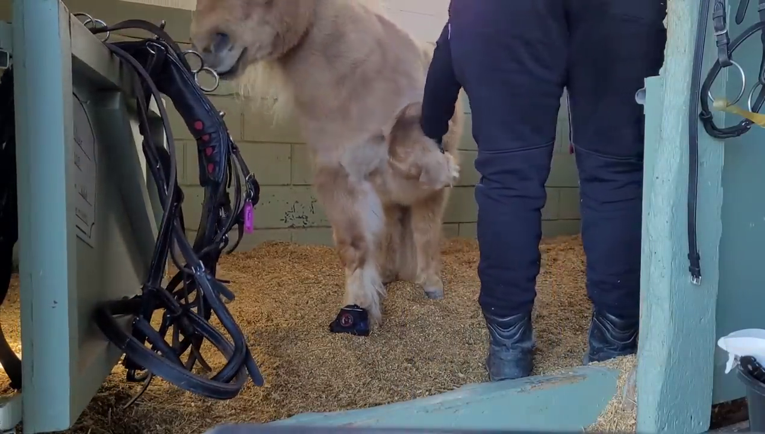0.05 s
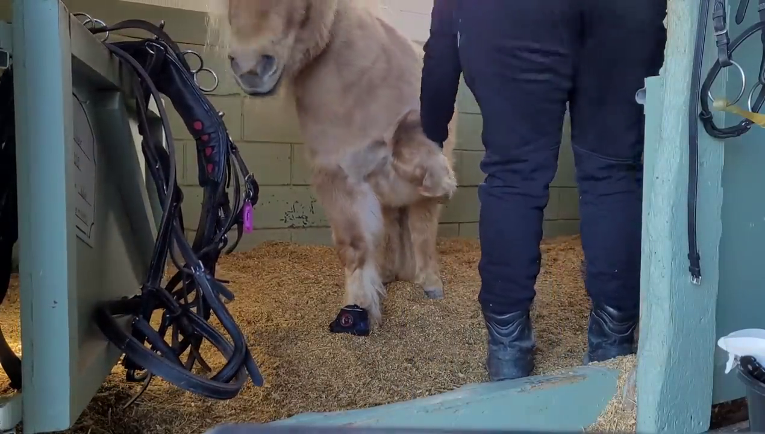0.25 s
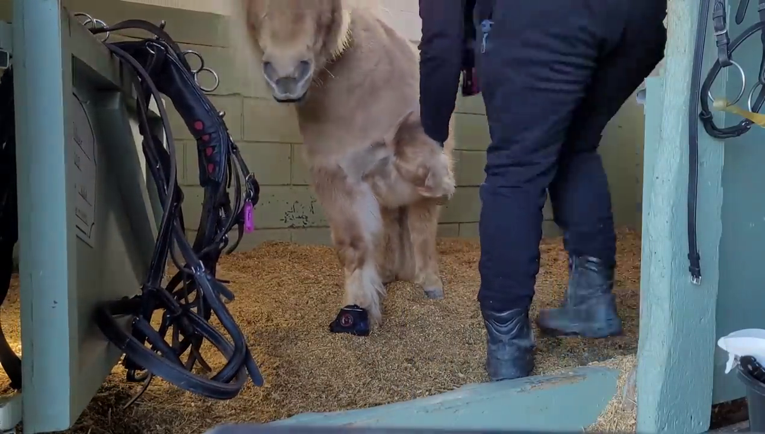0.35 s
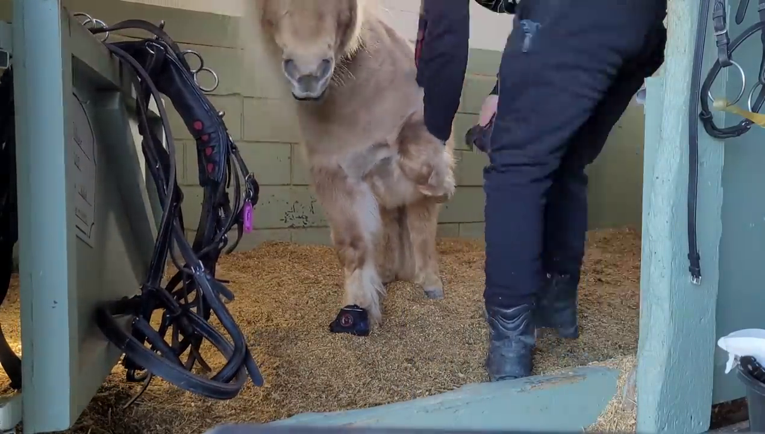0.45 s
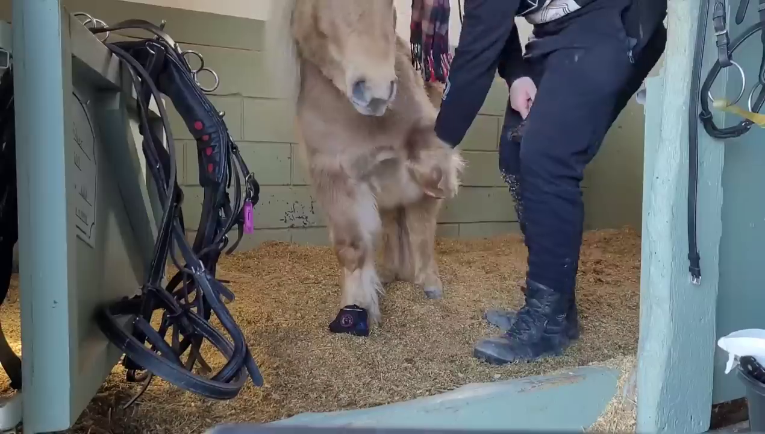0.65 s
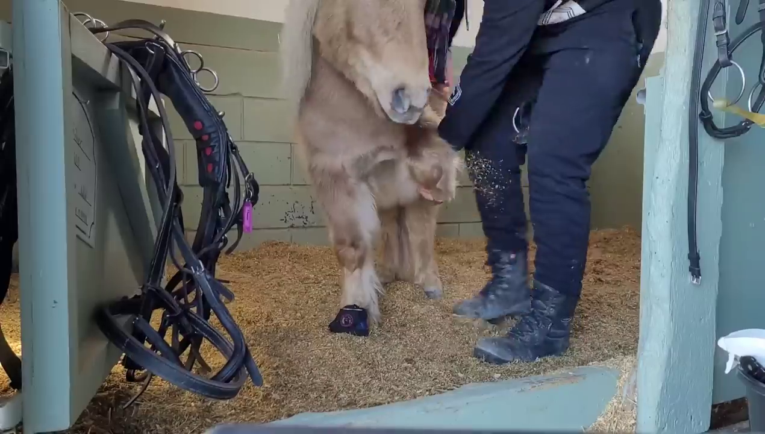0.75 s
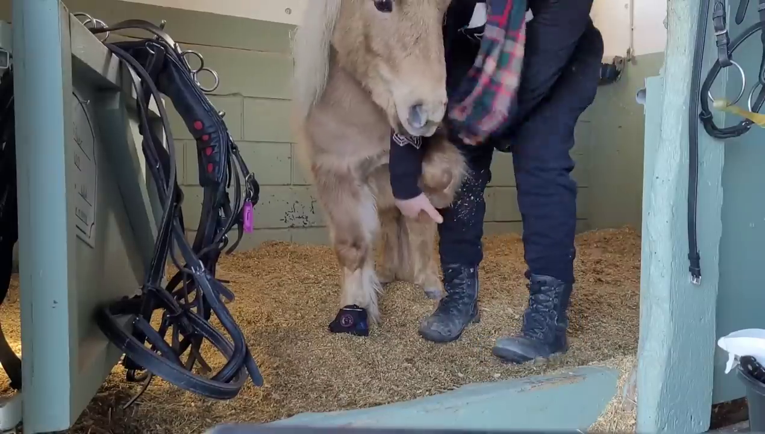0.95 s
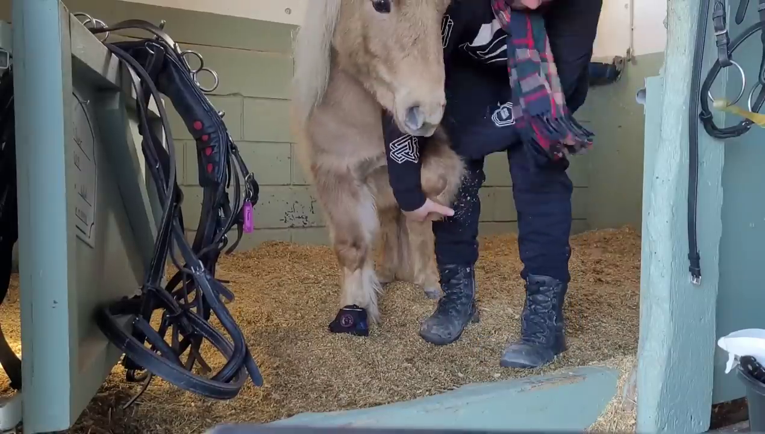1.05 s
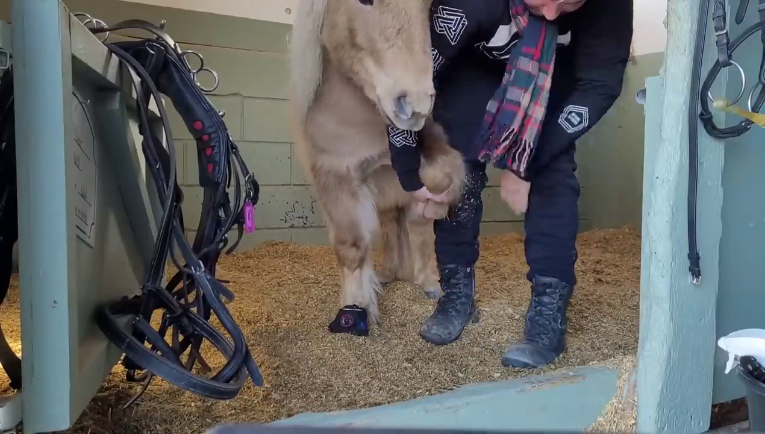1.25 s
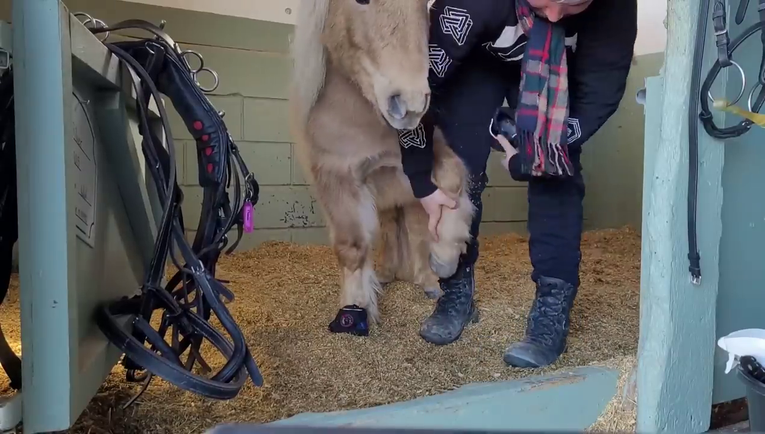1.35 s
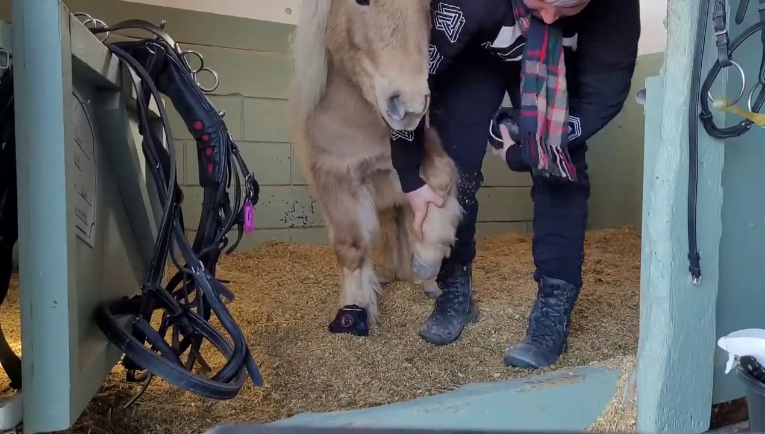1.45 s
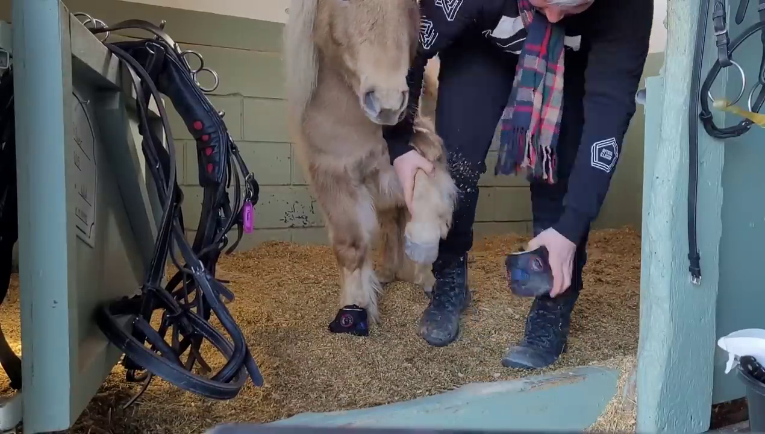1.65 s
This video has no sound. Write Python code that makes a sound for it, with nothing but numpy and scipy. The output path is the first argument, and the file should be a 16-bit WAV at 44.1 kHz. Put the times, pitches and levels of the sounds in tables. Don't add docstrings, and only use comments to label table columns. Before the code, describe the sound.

One dull, hollow wooden knock in a small stable, with soft rustles, ticks and low hum.

```python
import sys
import numpy as np
from scipy import signal
from scipy.io import wavfile
from scipy.ndimage import uniform_filter1d

SR = 44100
rng = np.random.default_rng(int(sys.argv[2]) if len(sys.argv) > 2 else 0)


def materialize(psi):
    bounded = np.clip(np.atleast_2d(psi).T, -1, 1)
    quanta = np.round(bounded * 32767).astype(np.int16)
    wavfile.write(sys.argv[1], SR, quanta)


def voltage_ratio(decibels):
    exponent = np.asarray(decibels, float) / 20
    return 10 ** exponent


N = 74970


def rms_one(x):
    return x / np.sqrt(np.mean(x ** 2) + 1e-20)


def in_time(rows):
    s, *columns = np.transpose(rows)
    return [np.interp(np.arange(N) / SR, s, column) for column in columns]


def at_hz(points, hz):
    table_hz, values = np.transpose(points)
    return np.interp(np.log(hz), np.log(table_hz), values)


def pan(db):
    return voltage_ratio(np.array([[db / 2], [-db / 2]]))


def filtered(x, order, cut_hz, kind):
    return signal.sosfilt(signal.butter(order, cut_hz, kind, fs=SR, output="sos"), x)


def drift(rate):
    r = np.exp(-80 * np.pi * rate / SR)
    noise = rng.standard_normal(N // 40 + 2002)
    slow = signal.lfilter([1], [1, -2 * r, r * r], noise)[2000:]
    return np.interp(np.arange(N) / 40, np.arange(len(slow)), rms_one(slow))


def strikes(s, db):
    out = np.zeros(N)
    out[(np.asarray(s) * SR).astype(int)] = voltage_ratio(np.asarray(db))
    return out


def ring(clicks, hz, t60):
    r, w = voltage_ratio(-60 / (t60 * SR)), 2 * np.pi * hz / SR
    return signal.lfilter([0, np.sin(w)], [1, -2 * r * np.cos(w), r * r], clicks + 1e-18)


def ring_modes(modes, clicks, cut_hz):
    body = sum(voltage_ratio(db) * pan(lean_db) * ring(clicks, hz, t60) for hz, db, t60, lean_db in modes)
    return filtered(body, 3, cut_hz, "low")


def grains():
    per_s, spread_db = 11000, 4.5
    sizes = voltage_ratio(spread_db * np.minimum(rng.exponential(1, (2, N)), 4))
    signs = rng.choice([-1, 1], (2, N))
    return rms_one(sizes * signs * (rng.random((2, N)) < per_s / SR))


def banded(spectrum, patchy_db, white):
    # frequency in Hz, left-right likeness from -1 to 1.
    likeness = [(60, 0.91), (180, 1), (550, 0.25), (1650, -0.21), (4970, -0.1), (15000, 0.0087)]
    # frequency in Hz, left minus right in dB.
    lean = [(60, -2.5), (130, 10.5), (240, -1.5), (950, -2), (3770, 7.5), (15000, -2.5)]
    out, together = 0, drift(8)
    edges = 15.5 * 2 ** np.arange(0, 10.1, .5)
    for k, (low, high) in enumerate(zip(edges, edges[1:])):
        mid, side = filtered(white[k % 2], 2, [low, high], "band")
        hz = np.sqrt(low * high)
        alike = np.clip(at_hz(likeness, hz), -1, 1)
        flicker_db = patchy_db * (.5 * together + drift(25))
        gain = voltage_ratio(at_hz(spectrum, hz) + flicker_db) * pan(at_hz(lean, hz))
        out = out + gain * (np.sqrt(1 + alike) * mid + np.sqrt(1 - alike) * side * [[1], [-1]])
    return rms_one(out)


def still_air():
    # frequency in Hz, level in dB per Hz.
    air_colour = [(15, -32.5), (25, -2), (75, 4), (122, -8), (323, -8), (763, -28.5), (850, -39.5),
                  (2710, -69.5), (15600, -53.5)]
    # time in seconds, level in dB.
    draught = [(0, 1.5), (.2, -2), (.33, 0.5), (.4, -4.5), (.5, 1.5), (.65, -1), (.78, 0), (.88, -0.5),
               (1.0, 0), (1.2, 2), (1.3, -1.5), (1.5, -1), (1.7, -1)]
    swell_db, = in_time(draught)
    return voltage_ratio(-48.5 + swell_db) * banded(air_colour, patchy_db=-2.5, white=rng.standard_normal((2, 2, N)))


def motor():
    # time in seconds, pitch in Hz, level in dB.
    motor_run = [(0, 69.2, -55.5), (.15, 62.1, -48), (.22, 67.56, -42.5), (.44, 67.7, -49.5),
                 (.53, 68.1, -52), (.62, 64.77, -43), (.665, 66.6, -49), (.715, 64.44, -44.5),
                 (.77, 66.2, -52), (.88, 68.9, -45.5), (1.0, 66.8, -45), (1.11, 68.8, -51),
                 (1.19, 66.9, -47.5), (1.35, 68.72, -46), (1.44, 67.7, -47.5), (1.7, 69.5, -49.5)]
    # multiple of the pitch, level in dB.
    overtones = [(1, 1), (2, -12), (3, -18.5), (4, -40)]
    flutter_db, flutter_per_s, wander = 2.2, 5, .04
    hz, db = in_time(motor_run)
    phase = 2 * np.pi * np.cumsum(hz * (1 + wander * drift(5.76))) / SR
    out = 0
    for k, overtone_db in overtones:
        level = np.sqrt(2) * voltage_ratio(db + overtone_db + flutter_db * drift(flutter_per_s))
        apart = 0.25 * drift(4.4) * [[1], [-1]]
        out = out + level * pan(-4.0) * np.cos(k * phase + apart)
    return out


def feet():
    # time in seconds, effort in dB.
    shuffle = [(0, -77.5), (.2, -72.5), (.43, -74.5), (.47, -68.5), (.56, -71), (.65, -70.5), (.7, -66),
               (.93, -66), (1.1, -67), (1.25, -64.5), (1.32, -71), (1.38, -72), (1.43, -70.5), (1.52, -70),
               (1.57, -73), (1.7, -72)]
    # frequency in Hz, level in dB per Hz.
    shavings = [(300, 0.5), (700, 4), (1200, -4), (1900, -7.5), (2500, -26.5), (5000, -24.5),
                (16000, -33.5)]
    effort_db, = in_time(shuffle)
    return voltage_ratio(effort_db + 3.0) * banded(shavings, patchy_db=-1.4, white=[grains(), grains()])


def rustles():
    # start in seconds, length in seconds, level in dB, centre in Hz, width in octaves.
    brushes = [(0.052, 0.042, -82.5, 6740, 0.79), (0.053, 0.037, -86, 13900, 0.56),
               (0.458, 0.048, -81.5, 4040, 2.1), (0.526, 0.082, -82.5, 14500, 0.75),
               (0.567, 0.064, -77, 13000, 1.3), (0.554, 0.084, -79, 7800, 0.57),
               (0.662, .03, -84, 14400, 0.52), (0.78, 0.034, -84, 4500, 1.1),
               (0.93, 0.042, -78, 2180, 0.66), (0.959, 0.021, -78.5, 2400, 0.87),
               (0.997, 0.028, -71, 2920, 0.28), (0.988, 0.028, -67, 2180, 0.74),
               (1.003, 0.035, -82.5, 4440, 0.073), (1.141, 0.027, -76.5, 4974, 0.95),
               (1.256, 0.027, -75, 4500, 1.45), (1.262, 0.017, -86, 5498, 0.13),
               (1.143, .025, -90, 5660, 0.18), (1.334, 0.017, -86, 2415, 0.65),
               (1.354, 0.019, -81.5, 3130, 0.2), (1.358, 0.029, -63, 907, 0.45),
               (1.352, 0.041, -77.5, 9964, 2.1), (1.441, 0.023, -69, 12400, 0.53),
               (1.446, 0.018, -73.5, 3950, 1.07), (1.479, 0.0054, -75, 14000, 0.69),
               (1.488, 0.0317, -71.5, 4400, 3.1), (1.491, 0.021, -70, 12550, 0.78),
               (1.584, 0.02, -86.5, 7500, 0.51), (1.631, 0.02, -86.5, 7170, 0.34),
               (1.635, 0.081, -91, 13600, 0.48)]
    # start in seconds, length in seconds, level in dB, centre in Hz, width in octaves.
    snaps = [(0.346, 0.0022, -74.5, 13020, .5), (0.35, 0.0016, -86, 13600, 0.36),
             (0.435, 0.004, -77, 12800, 0.59), (1.232, 0.0034, -64.5, 1380, 1.9),
             (1.426, 0.0034, -72, 10620, 0.66), (.484, 0.01, -77, 3980, 0.61),
             (0.592, 0.0035, -57, 600, 0.8), (0.828, 0.019, -58, 294, 0.33),
             (0.969, 0.011, -52.5, 557, 0.65), (1.454, 0.0082, -57.5, 854, 0.79),
             (1.493, 0.025, -67, 936, 0.64), (1.506, 0.002, -70, 3583, 1.3),
             (1.662, 0.013, -82.5, 10340, 0.71)]
    rise, fall, longest_t60_s = .22, 2.5, 0.28
    t, crackle, out = np.arange(N) / SR, grains(), np.zeros((2, N))
    for s, length, db, hz, octaves in [*brushes, *snaps]:
        edges = np.minimum(hz * 2 ** (octaves * np.array([-.5, .5])), [15500, 17000])
        swell = np.sin(np.pi / 2 * np.clip((t - s) / (rise * length), 0, 1)) ** 2
        t60 = min(longest_t60_s, fall * length)
        decay = voltage_ratio(-60 * np.maximum(t - s - length, 0) / t60)
        out += voltage_ratio(db) * swell * decay * rms_one(filtered(crackle, 3, edges, "band"))
    return out


def ticks():
    # time in seconds, level in dB, pitch in Hz, t60 in seconds, left minus right in dB.
    taps = [(.046, -34, 276, 0.05, 0.5), (.458, -72, 1810, 0.019, -3), (.481, -66.5, 1907, 0.043, -13),
            (.488, -63.5, 1840, 0.039, -2), (0.487, -57, 1259, 0.03, -1.5), (.509, -68, 1900, 0.014, 2),
            (.622, -85, 7730, 0.025, 15), (0.625, -80, 10480, 0.025, 0), (.688, -66, 1530, 0.026, -12),
            (0.7171, -52.5, 1250, 0.02, -4), (1.666, -72.5, 1670, 0.029, 6),
            (1.668, -75, 2860, 0.013, -3.5)]
    rise_cycles, detune_spread = 5.0, .035
    out = np.zeros((2, N))
    for s, db, hz, t60, lean_db in taps:
        age = np.maximum(np.arange(N) / SR - s, 0)
        shape = voltage_ratio(db + 8 - 60 * age / t60) * (1 - np.exp(-age * hz / rise_cycles)) ** 2
        mode_hz = hz * (1 + detune_spread * rng.normal(0, 1, (2, 3, 1)))
        out += pan(lean_db) * shape * np.sin(2 * np.pi * mode_hz * age).sum(axis=1)
    return out


def panel(s, db):
    # pitch in Hz, level in dB, t60 in seconds, left minus right in dB.
    panel_modes = [(221.2, -24, 0.14, 2), (252.4, -21.5, 0.13, -6), (305.5, -3, 0.042, -0.5),
                   (411, -18.5, 0.052, -14), (492, -13.5, 0.068, -7.5), (655, -26.5, 0.1, 3.5),
                   (819.5, -16, 0.063, -3), (953, -35.5, 0.032, -25), (1039, -25.5, 0.075, 14.5)]
    return ring_modes(panel_modes, strikes(s, db), cut_hz=630)


def frame_boom():
    # time in seconds, level in dB.
    shoves = [
        (0.248, -22),
        (0.256, -24),
        (0.2723, -22),
    ]
    # pitch in Hz, level in dB, t60 in seconds, left minus right in dB.
    boom_modes = [(54, -17, .3, -1), (78, .5, .42, -2), (116, -5, .19, -2.5)]
    damped_s, damped_t60_s = .335, .2
    boom = ring_modes(boom_modes, strikes(*np.transpose(shoves)), cut_hz=244)
    return boom * voltage_ratio(-60 * np.maximum(np.arange(N) / SR - damped_s, 0) / damped_t60_s)


def crack(s, db):
    # frequency in Hz, level in dB per Hz.
    crack_colour = [(300, -14), (800, -1.5), (1300, -15.5), (2000, -20), (3200, -33.5), (5000, -32.5),
                    (7800, -46), (9500, -69), (16000, -49.5)]
    clicks, fade = strikes(s, db), 0
    for part_db, t60 in ((0, 0.052), (-23.5, 0.29)):
        fade = fade + voltage_ratio(part_db) * signal.lfilter([1], [1, -voltage_ratio(-60 / (t60 * SR))], clicks)
    fade = uniform_filter1d(fade, int(.008 * SR))
    noise = banded(crack_colour, patchy_db=-0.5, white=rng.standard_normal((2, 2, N)))
    return fade * pan(-2.5) * noise


def knock():
    # time in seconds, panel level in dB, crack level in dB.
    contacts = [
        (0.2356, -18, -40.5),
        (.2385, -25.5, -43.5),
        (0.2426, -8, -42),
        (0.2465, -6.5, -33.5),
        (0.2554, -7, -41.5),
        (0.275, -24.5, -59),
    ]
    s, panel_db, crack_db = np.transpose(contacts)
    wood = panel(s, panel_db) - frame_boom()
    return filtered(wood, 2, 45, "high") + crack(s, crack_db)


def stall(x):
    t60_s, wall_cut_hz = 0.096, 1800
    out, dull = np.zeros((2, N)), np.exp(-2 * np.pi * wall_cut_hz / SR)
    for k, lag in enumerate((rng.uniform(.008, .03, 16) * SR).astype(int)):
        loop, gain, state = x.copy(), voltage_ratio(-60 * lag / SR / t60_s), [0.]
        for i in range(lag, N, lag):
            back, state = signal.lfilter([gain * (1 - dull)], [1, -dull], loop[i - lag:i], zi=state)
            loop[i:i + lag] += back[:N - i]
        out[k % 2] += (loop - x) * (-1) ** (k // 2)
    return filtered(out, 2, 166, "high")


def scene():
    bed = still_air() + motor() + feet() + rustles()
    hits = ticks() + knock()
    room = voltage_ratio(-12.5) * stall(hits.mean(axis=0))
    return bed + hits + room


def band_limit(x):
    return signal.sosfilt(signal.butter(12, 15720, fs=SR, output="sos"), x)


def record(dry):
    cut = filtered(dry, 1, 15, "high")
    cut = signal.sosfilt(signal.cheby2(16, 50, 16050, fs=SR, output="sos"), cut)
    return band_limit(cut)


dry = scene()
out = record(dry)
materialize(out)
```